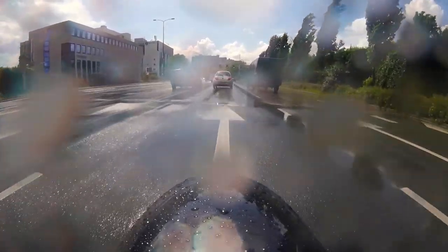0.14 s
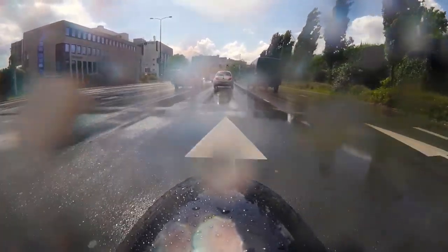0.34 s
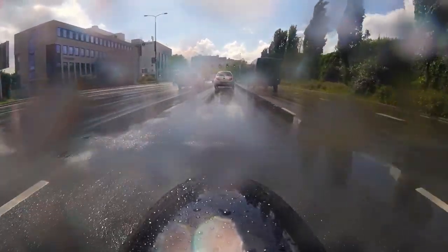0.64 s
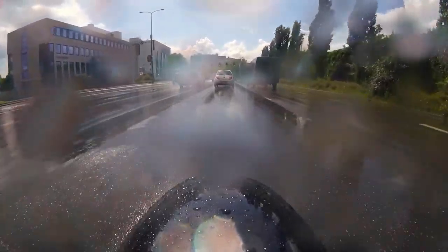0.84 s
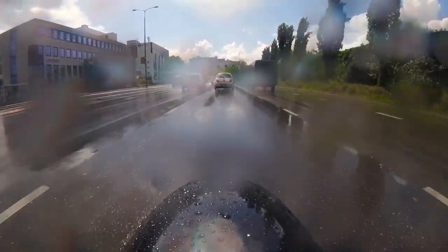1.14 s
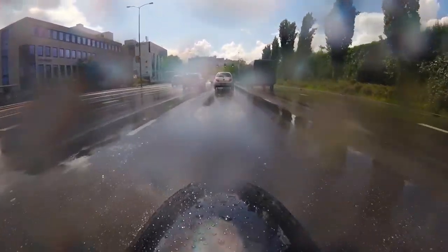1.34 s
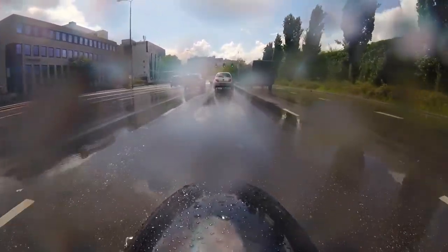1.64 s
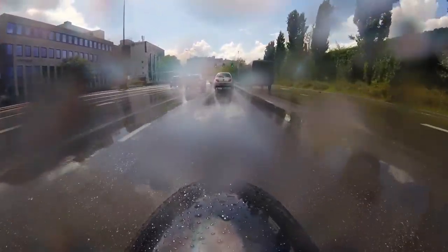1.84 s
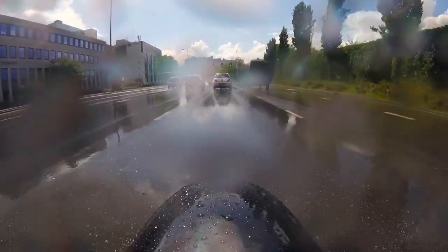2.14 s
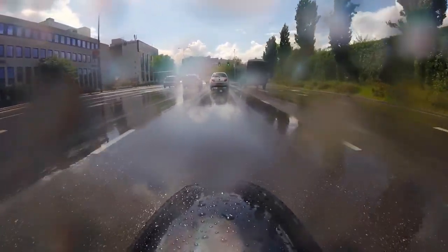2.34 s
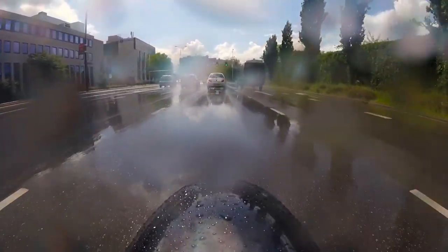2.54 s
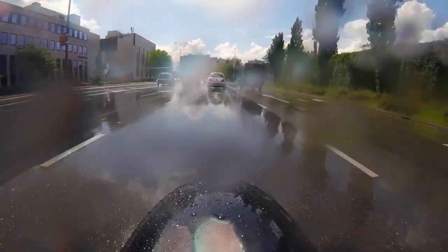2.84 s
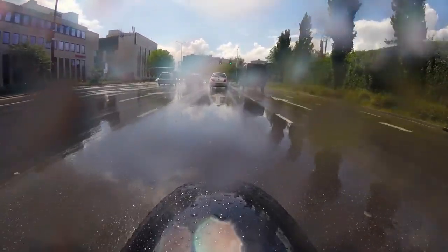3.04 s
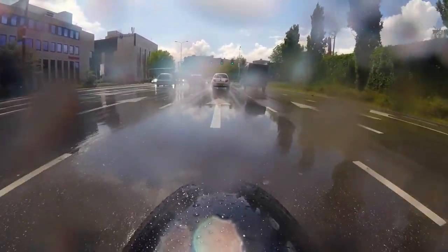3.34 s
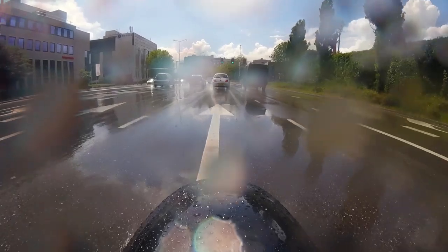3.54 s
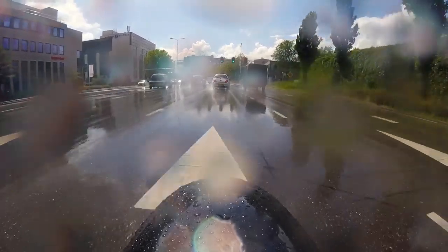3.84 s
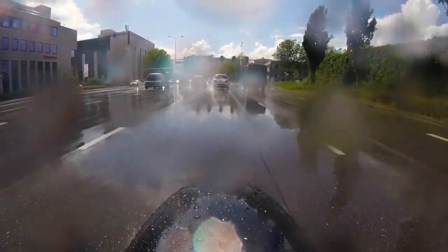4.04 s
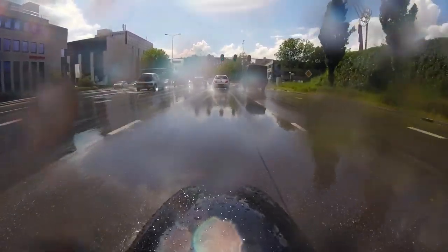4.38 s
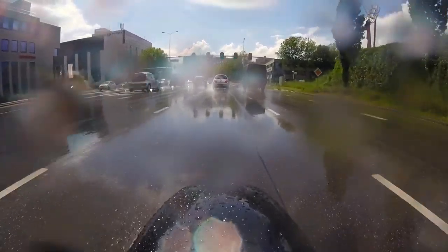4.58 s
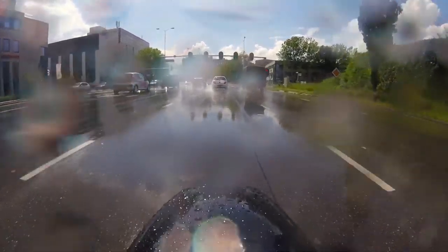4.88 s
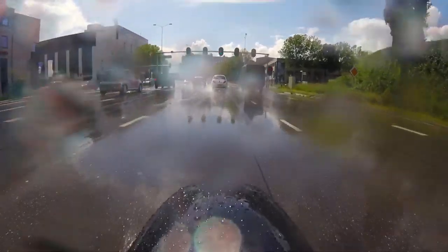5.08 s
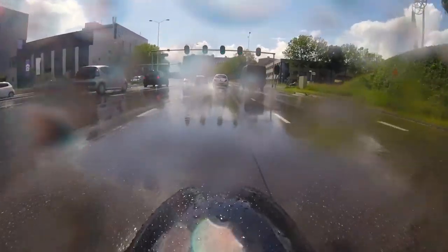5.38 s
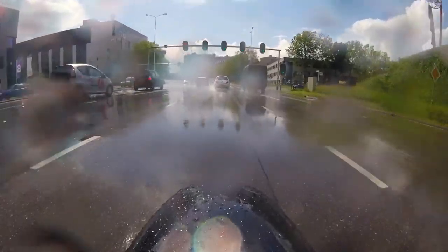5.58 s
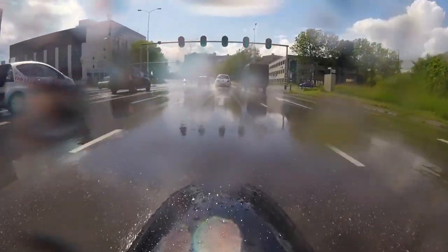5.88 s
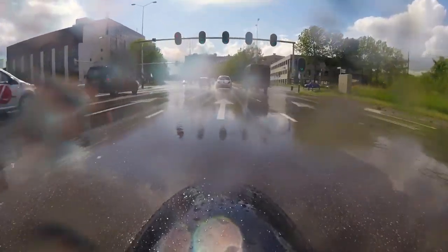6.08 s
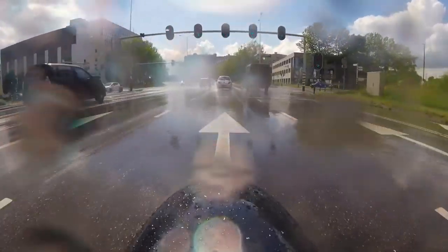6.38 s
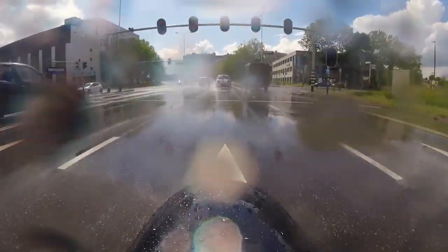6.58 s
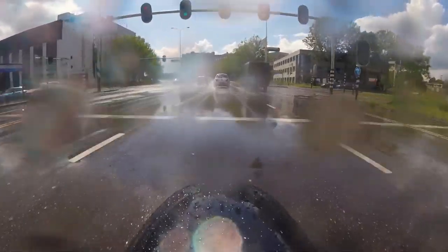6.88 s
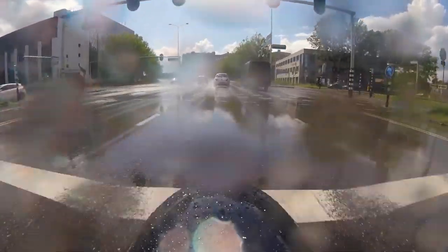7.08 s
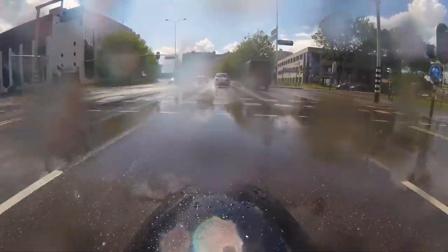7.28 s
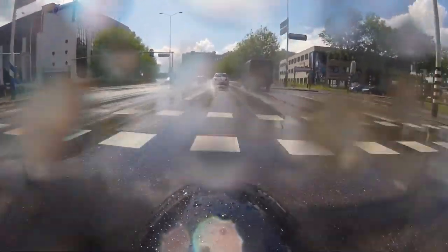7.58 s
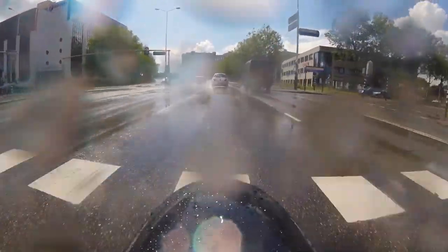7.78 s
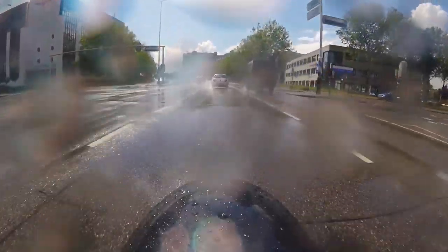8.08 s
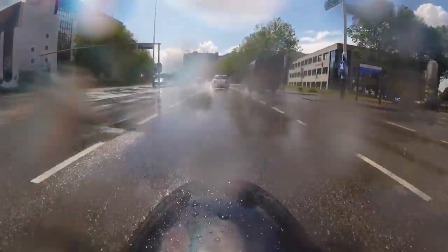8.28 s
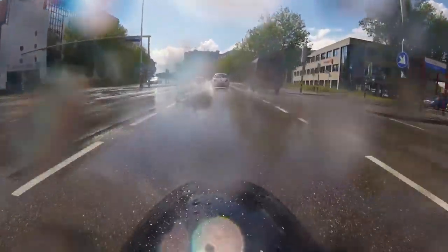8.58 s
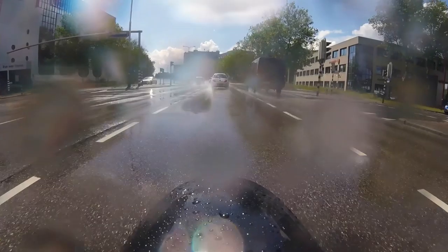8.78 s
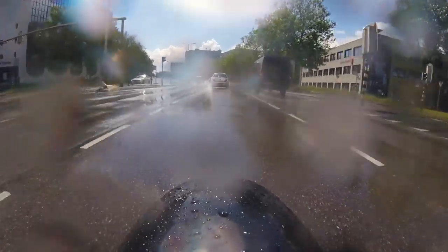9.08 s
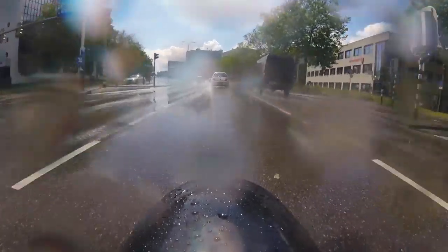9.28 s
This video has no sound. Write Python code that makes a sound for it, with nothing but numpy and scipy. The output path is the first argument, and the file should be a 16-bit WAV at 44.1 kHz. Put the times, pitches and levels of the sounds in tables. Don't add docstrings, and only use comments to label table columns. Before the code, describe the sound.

Wind bursts irregularly against an enclosed microphone on a moving motorcycle: deep thumps, fluttering buffets, tearing gusts and sharp pops. The engine's smooth low hum gathers speed, with a faint gear whine above, loudest at about five seconds and nearly buried by eight. Water hiss from wet tyres and passing traffic runs behind, resonant and narrow, stronger around three to four seconds. Open road, mono, with peaks held down.

```python
import sys
import numpy as np
from scipy import signal
from scipy.fft import rfft, irfft
from scipy.io import wavfile

SR = 44100
rng = np.random.default_rng(int(sys.argv[2]) if len(sys.argv) > 2 else 0)


def attenuation_scalar(level_db):
    decades = np.asarray(level_db, float) / 20
    return 10 ** decades


def log_audio(samples):
    frames = np.atleast_2d(samples).T
    limited = np.clip(frames, -1, 1)
    pcm = np.round(limited * 32767).astype(np.int16)
    wavfile.write(sys.argv[1], SR, pcm)


N = 415422

# time in seconds, strength in dB.
AIRFLOW = [(0, -28), (.6, -30), (.63, -24), (1.15, -26.5), (1.72, -24.5), (1.85, -29.5), (2.28, -32),
           (2.4, -23.5), (3.1, -31), (4.0, -24.5), (4.36, -20), (4.47, -32), (5.56, -30.5), (5.6, -23.5),
           (6.4, -26), (7.9, -19), (8.2, -26.5), (9.42, -24)]
WIND_RANGE_HZ = [
    40,
    250,
    1140,
]
# frequency in Hz, density in dB per Hz.
WIND_SPECTRUM = [(12, -40), (20, -4), (59, 1), (96, -2), (124, -2.5), (290, -10), (337, -11.5),
                 (1160, -24.5), (2430, -39), (3600, -52.5), (4680, -65), (7920, -120)]
# time in seconds, half length in seconds, thump in dB, tearing in dB.
GUSTS = [(0.131, .02, 9, -3), (.26, 0.035, 9, 5.5), (0.411, 0.01, 16, -1), (0.642, 0.021, -11, 0.5),
         (0.82, 0.065, 4, 2.5), (0.924, .03, 0, -5), (1.066, 0.053, 4, -1), (1.214, 0.011, -8, 3),
         (1.31, 0.045, 3.5, 5.5), (1.438, 0.036, 1.5, 10.5), (1.463, 0.011, -9, -14),
         (1.5, 0.012, -4.5, 10.5), (1.557, .025, 1.5, 7.5), (1.703, 0.043, 0.5, 7.5),
         (1.96, .015, 12, -0.5), (2.074, 0.012, 0, 10.5), (2.229, 0.02, 14, 2.5), (2.418, .03, 4, -0.5),
         (2.64, 0.023, 8, 3), (2.839, .015, -8.5, -1), (2.981, 0.059, 6.5, 3), (3.109, 0.012, 4.5, 1.5),
         (3.26, 0.016, 2.5, 7), (3.44, 0.064, 5.5, 1), (3.542, 0.024, 2.5, 1.5), (3.637, 0.02, 7, 1.5),
         (3.85, 0.076, -2.5, 2.5), (4.094, 0.035, 3, -1.5), (4.313, 0.044, 1, 4.5), (4.207, .04, -1.5, 0)]
# time in seconds, half length in seconds, thump in dB, tearing in dB.
LATE_GUSTS = [(4.52, .015, 3.5, 2), (4.62, .05, -4.5, -2), (4.855, 0.015, -1.5, 8.5), (4.98, .045, 5, 6),
              (5.19, 0.036, -1.5, 2.5), (5.61, .03, 1.5, 4), (5.72, 0.017, 6.5, 7.5),
              (5.85, 0.049, -1.5, 1.5), (6.02, 0.073, -1, 5), (6.109, 0.038, -0.5, -6.5),
              (6.215, 0.011, 0, 6.5), (6.399, .06, -1.5, -3), (6.5, 0.029, 8.5, 6.5), (6.66, 0.016, 8, 6.5),
              (6.95, 0.078, 1, 8), (7.04, .02, 3, -7), (7.11, 0.09, 2, 5), (7.19, 0.037, 0.5, -5),
              (7.28, .035, 0, 3), (7.501, 0.098, -7, -1.5), (7.63, 0.049, -4.5, 0.5),
              (7.83, 0.0088, -2.5, 7), (8.07, 0.11, -0.5, 5), (8.52, 0.031, 5.5, 4.5),
              (8.739, 0.086, -0.5, -3), (8.848, 0.049, 4.5, 4.5), (9.0, 0.034, 1, -7),
              (9.08, 0.02, 5.5, 2.5), (9.208, 0.011, 2.5, -9.5), (9.26, 0.037, 3.5, 1.5)]
# time in seconds, change in dB.
SHOVES = [(.05, 8.5), (.47, -4.5), (.68, 6.5), (.74, -5.5), (1.0, -8.5), (1.26, 2), (1.32, -5), (1.44, 1.5),
          (1.52, 5), (1.58, -15), (1.68, -10.5), (1.78, 0.5), (1.92, -7.5), (2.07, -4.5), (2.2, -5.5),
          (2.99, 6.5), (3.12, 7.5), (3.5, 2.5), (5.72, 3.5), (5.78, -6), (6.3, -11), (6.64, 6.5),
          (6.71, -0.5), (6.98, 4.5), (7.06, 5), (7.19, -9), (7.42, 4.5), (7.53, -3), (9.08, 3), (9.2, 6.5)]
# time in seconds, firing rate in Hz.
FIRING = [(0, 62), (2.4, 67.9), (3.2, 71.9), (3.95, 74.7), (4.4, 78.2), (4.75, 80.8), (5.25, 84.6),
          (5.75, 88.6), (6.25, 92.2), (6.75, 95.8), (7.5, 99.5), (8.3, 102), (9.42, 102.2)]
# time in seconds, level in dB.
DRONE = [(0, -35), (2.4, -37), (3.9, -27.5), (4.45, -27.5), (4.62, -28), (4.8, -20.5), (5.1, -19),
         (5.4, -19), (5.7, -20), (6, -24), (6.3, -21.5), (6.8, -26), (7.3, -28.5), (7.6, -32), (8.2, -40),
         (9.42, -29)]
# multiple of firing rate, level in dB, blur in Hz, start in seconds, end in seconds.
GEARS = [(2, -38, 3, 2.6, 7.2), (3, -41, 3, .4, 8), (5.08, -40, 3, 8.32, 9.2), (6.12, -39, 4, 3.65, 4.4),
         (6.13, -49, 8, 4.5, 7.4), (6.52, -41, 3, 2.85, 4.1), (12.2, -46, 2, 2.5, 4.45),
         (12.2, -43, 5, 3.35, 4.1), (12.2, -53, 4, 4.7, 7), (14.78, -50, 5, 3, 4.4),
         (24.15, -59, 25, 4.9, 7.4), (48.25, -54, 60, 6.75, 7.7), (48.9, -53, 150, 8.1, 9.4)]
# time in seconds, spray in dB.
SPRAY = [(0, -48.5), (.52, -46.5), (.66, -49.5), (1.2, -52.5), (1.4, -49.5), (1.86, -52), (3.3, -43.5),
         (3.99, -41.5), (4.05, -43), (4.44, -44.5), (4.48, -55.5), (5.0, -52), (5.9, -50), (6.8, -50.5),
         (7.25, -48), (7.45, -51.5), (8.2, -50), (9.42, -50.5)]
# frequency in Hz, density in dB per Hz.
HOUSING = [(880, -19.5), (1500, -3.5), (2000, -4), (2210, 1.5), (2540, 0.5), (3160, -1), (3500, -1.5),
           (3990, -4), (5400, 2.5), (5710, 1), (5980, -4), (6610, -3), (7550, -12.5), (9090, -11.5),
           (9600, -18.5), (12500, -42.5), (21100, -120)]
# time in seconds, change in dB.
SPLASHES = [(.52, 2), (.82, 3), (1.47, -8), (1.52, -7), (1.545, 6), (1.65, -4), (1.73, 7.5), (5.98, 7.5),
            (6.92, 5), (7.82, 6), (7.9, 3.5), (7.93, 9), (8.0, 6), (8.08, 7.5), (8.18, -4), (9.1, -8)]
# time in seconds, peak in dB, low push in dB.
POPS = [(.132, -7.5, 8), (.626, -12, 6), (.642, -3, 4), (.651, -3, -15), (.851, -5, -5), (.912, -1, -22),
        (1.049, -21, -2), (1.327, -6.5, -15), (1.429, -10, 7), (1.502, -2, -1), (2.063, -7.5, -10),
        (2.8, -7, -5), (3.325, -8, 10), (4.04, -18, 3), (4.354, -4, -15), (4.459, -5.5, -3),
        (4.514, -10, 6), (4.952, -15, 1), (5.59, -5.5, -3), (5.738, -8, -7), (5.966, -5, -7),
        (6.31, -5, -12), (6.66, -24, 7), (7.42, -5.5, 7), (7.757, -15, -12), (7.872, -13, 11),
        (8.59, -9, -4), (9.064, -6, -1), (9.169, -9, 3), (9.313, -10, 1)]
# time in seconds, share removed from 0 to 1.
NOTCH_DEPTH = [
    (0, 0.17),
    (7.2, 0.6),
    (7.6, 0.85),
    (8.2, 1),
    (8.5, 0.6),
    (9.42, 0.05),
]

RUMBLE_FOLLOWS, TEARING_FOLLOWS = 0.76, 0.92
RUMBLE_DB_PER_HZ, TEARING_DB_PER_HZ = -0.1052, 0.083
RUMBLE_SWAY_DB, BUFFET_SWAY_DB, TEARING_SWAY_DB = 1.5, 1.2, 0.6
SHOVE_S = 0.035
GEAR_SWELL_S = 0.3
SPRAY_GAIN_DB, MIST_DB = 2.5, -5.5
MIST_THINS_S, MIST_GONE_S, MIST_LOSS_DB = 7.3, 8.2, 7.5
FINE_HZ, FINE_LOSS = 4300, 0.51
FINEST_HZ, FINEST_LOSS = 8300, 0.55
SPLASH_S, MIST_SPLASH_SHARE = 0.013, 0.35
POP_WIDTH_MS, POP_WIDTH_SPREAD = 0.44, 0.2
SMALL_POPS, SMALL_POP_DB, SMALL_POP_SPREAD_DB = 26, 13, 1
NOTCH_HZ, NOTCH_WIDTH_HZ = 5980, 630
CUTOFF_HZ, CEILING = 9585, 0.41
LATE_AIR_DB, LATE_AIR_S = -66, 8.35


def rms_one(x):
    return x / np.sqrt(np.mean(x ** 2) + 1e-20)


def in_time(rows):
    s, *columns = np.transpose(rows)
    return [np.interp(np.arange(N) / SR, s, c) for c in columns]


def at_hz(points, hz):
    point_hz, db = np.transpose(points)
    return np.interp(np.log(hz), np.log(point_hz), db)


def filtered(order, hz, kind, x):
    return signal.sosfilt(signal.butter(order, hz, kind, fs=SR, output="sos"), x)


def filtered_zero_phase(order, hz, kind, x):
    return signal.sosfiltfilt(signal.butter(order, hz, kind, fs=SR, output="sos"), x)


def drift(rate_hz):
    r = np.exp(-40 * np.pi * rate_hz / SR)
    slow = signal.lfilter([1], [1, -2 * r, r * r], rng.standard_normal(N // 20 + 4002))[4000:]
    return np.interp(np.arange(N) / 20, np.arange(len(slow)), rms_one(slow))


def bumps(s, half_s, db):
    t = np.arange(N) / SR
    return sum(d * np.exp(-((t - a) / max(w, .005)) ** 2) for a, w, d in np.broadcast(s, half_s, db))


def wind_swing():
    (flow_db,), (firing_hz,) = in_time(AIRFLOW), in_time(FIRING)
    flow_db = flow_db - flow_db.mean()
    speed_hz = firing_hz - firing_hz.mean()
    s, half_s, thump_db, tear_db = np.transpose(GUSTS + LATE_GUSTS)
    thump_db, tear_db = bumps(s, half_s, thump_db), bumps(s, half_s, tear_db)
    shove_s, shove_db = np.transpose(SHOVES)
    rumble = RUMBLE_FOLLOWS * flow_db + RUMBLE_DB_PER_HZ * speed_hz + 0.49 * thump_db
    rumble = rumble + bumps(shove_s, SHOVE_S, shove_db) + RUMBLE_SWAY_DB * drift(8)
    buffet = flow_db + thump_db + BUFFET_SWAY_DB * drift(18.5)
    tearing = TEARING_FOLLOWS * flow_db + TEARING_DB_PER_HZ * speed_hz + tear_db
    return [rumble, buffet, tearing + TEARING_SWAY_DB * drift(10.4)]


def bands(low_hz, count, spectrum):
    white = rng.standard_normal((2, N))
    for k in range(count):
        low, high = low_hz * 2 ** (k / 3), low_hz * 2 ** ((k + 1) / 3)
        hz = np.sqrt(low * high)
        yield hz, attenuation_scalar(at_hz(spectrum, hz)) * filtered(2, [low, high], "band", white[k % 2])


def wind(lump_db=1.9, tear_db=2.0, own_db=0.8):
    swing = wind_swing()
    lumps, tears, out = drift(50), drift(140), 0
    for hz, noise in bands(19.72, count=24, spectrum=WIND_SPECTRUM):
        place = np.interp(np.log(hz), np.log(WIND_RANGE_HZ), np.arange(3))
        gust_db = sum(max(0, 1 - abs(place - k)) * swing[k] for k in range(3))
        gust_db *= 1 + 0.53 * max(0, np.log2(hz / 1500))
        burst_db = min(1.4 * place, 1) * lump_db * lumps + place / 2 * tear_db * tears
        out = out + attenuation_scalar(gust_db + burst_db + own_db * drift(4.4)) * noise
    return attenuation_scalar(-22) * rms_one(out)


def engine():
    (firing_hz,), (drone_db,) = in_time(FIRING), in_time(DRONE)
    turn, t = 2 * np.pi * np.cumsum(firing_hz) / SR, np.arange(N) / SR
    out = attenuation_scalar(drone_db + 3) * np.sin(turn + 0.2 * drift(8))
    for multiple, level_db, blur_hz, start_s, end_s in GEARS:
        swell = np.clip(np.minimum(t - start_s, end_s - t) / GEAR_SWELL_S + 0.5, 0, 1)
        clean = 1 / (1 + blur_hz / 12)
        rough = np.sqrt(1 - clean)
        tone = (np.sqrt(2 * clean) + rough * drift(blur_hz)) * np.sin(multiple * turn)
        tone += rough * drift(blur_hz) * np.cos(multiple * turn)
        out += swell * attenuation_scalar(level_db) * tone
    return out


def spray(flicker_db=0.07, own_db=0.78):
    splash_s, splash_db = np.transpose(SPLASHES)
    splash_db = bumps(splash_s, SPLASH_S, splash_db)
    wet_db = in_time(SPRAY)[0] + SPRAY_GAIN_DB
    dry_share = np.interp(np.arange(N) / SR, [MIST_THINS_S, MIST_GONE_S], [0, 1])
    spray_db = wet_db + splash_db
    mist_db = wet_db + MIST_DB - MIST_LOSS_DB * dry_share + MIST_SPLASH_SHARE * splash_db

    hz = np.maximum(np.fft.rfftfreq(N, 1 / SR), 10)
    misty = 1 / (1 + (6050 / hz) ** 30)
    noise = rfft(rng.standard_normal(N)) * attenuation_scalar(at_hz(HOUSING, hz))
    coarse, mist = irfft(noise * (1 - misty), N), irfft(noise * misty, N)
    mist = mist - FINEST_LOSS * dry_share * filtered_zero_phase(2, FINEST_HZ, "high", mist)
    coarse = coarse - FINE_LOSS * dry_share * filtered_zero_phase(2, FINE_HZ, "high", coarse)

    flicker = flicker_db * drift(26)
    coarse = attenuation_scalar(spray_db + 0.5 + flicker) * rms_one(coarse)
    return coarse + attenuation_scalar(mist_db + 0.23 + flicker + own_db * drift(30)) * rms_one(mist)


def pop_rows():
    when, size, push = rng.uniform(0, 1, (SMALL_POPS, 3)).T
    s = when * N / SR
    peak_db = np.interp(s, *np.transpose(AIRFLOW)) + SMALL_POP_DB + SMALL_POP_SPREAD_DB * (2 * size - 1)
    return POPS + list(zip(s, peak_db, 14 * push - 7))


def pops():
    out, t = np.zeros(N + 2000), np.arange(1500) / SR
    torn = rms_one(filtered(1, [300, 1400], "band", rng.standard_normal(N + 2000)))
    rows = pop_rows()
    for (s, peak_db, push_db), (sign, skew, fat) in zip(rows, rng.uniform(-0.91, 1, (len(rows), 3))):
        width_ms = POP_WIDTH_MS * (1 + POP_WIDTH_SPREAD * fat)
        x = (t - .006) * 1000 / max(width_ms, .15)
        swing = (3.83 * x + 0.27 * skew) * np.exp(-1.5 * np.sqrt(x ** 2 + 0.11))
        slow = (t - .008) / 0.0032
        push = attenuation_scalar(min(push_db, 6) - 6) * 1.4 * slow * np.exp(-slow ** 2)
        at = max(round((s - .0045) * SR), 0)
        spit = attenuation_scalar(-16.0) * torn[at:at + 1500] * np.exp(-np.abs(t - .006) / 0.001)
        out[at:at + 1500] += attenuation_scalar(peak_db - 5.5) * (np.sign(sign) * (swing + push) + spit)
    return filtered(3, 2600, "low", out[:N])


def late_air():
    opening = np.clip((np.arange(N) / SR - LATE_AIR_S) / 0.25, 0, 1)
    white, faint = rng.standard_normal(N), 0
    for low_hz in np.arange(9400, 12900, 350):
        strip = filtered(3, [low_hz, low_hz + 350], "band", white)
        level = attenuation_scalar(-2.5 * (low_hz - 9400) / 1000)
        faint = faint + level * np.clip(2 * drift(9) + 1.5, 0, 1) * strip
    return attenuation_scalar(LATE_AIR_DB + 1.5 * drift(4)) * opening * faint


def scene():
    return (wind() + engine() + spray() + pops())[None]


def roll_off(x):
    return signal.sosfilt(signal.butter(12, 13400, fs=SR, output="sos"), x)


def record(dry):
    depth, = in_time(NOTCH_DEPTH)
    edges_hz = [NOTCH_HZ - NOTCH_WIDTH_HZ / 2, NOTCH_HZ + NOTCH_WIDTH_HZ / 2]
    port = dry - depth * filtered_zero_phase(2, edges_hz, "band", dry)
    held = port / (1 + (port / CEILING) ** 4) ** 0.25
    kept = signal.sosfiltfilt(signal.ellip(8, .3, 40, CUTOFF_HZ, fs=SR, output="sos"), held)
    return roll_off(kept + late_air())


dry = scene()
out = record(dry)
log_audio(out)
```